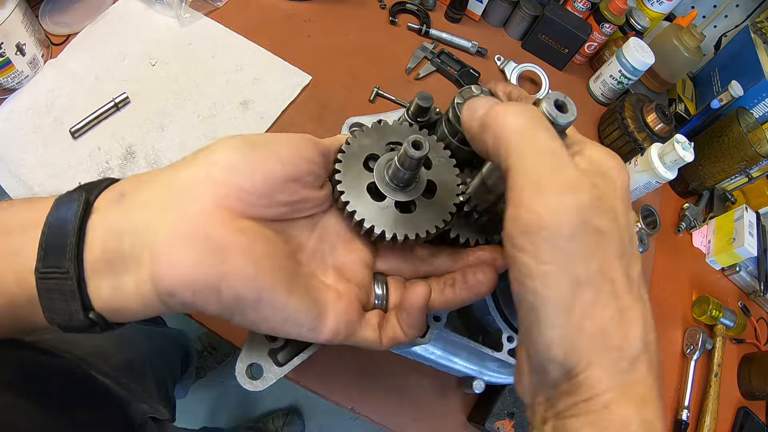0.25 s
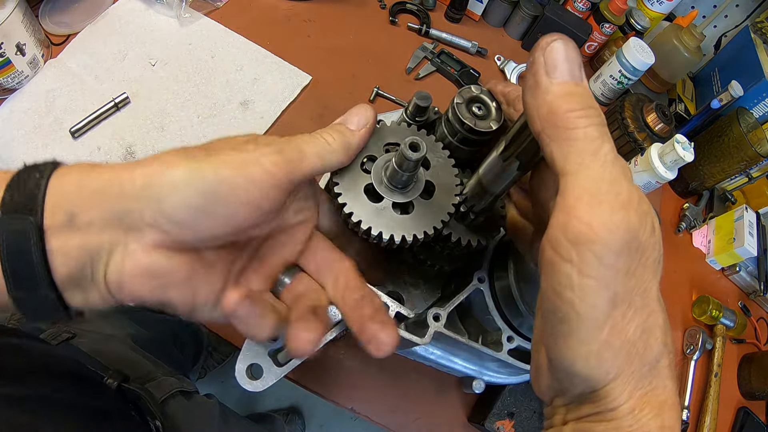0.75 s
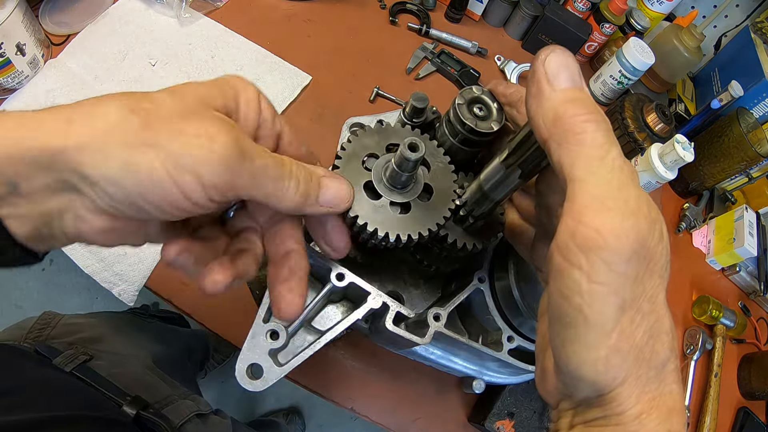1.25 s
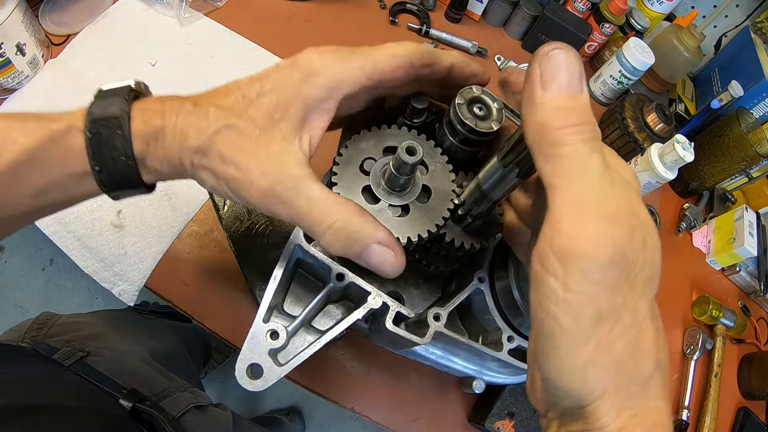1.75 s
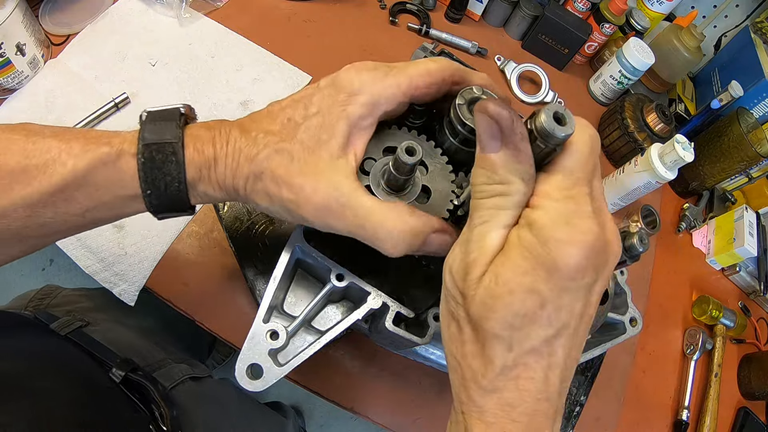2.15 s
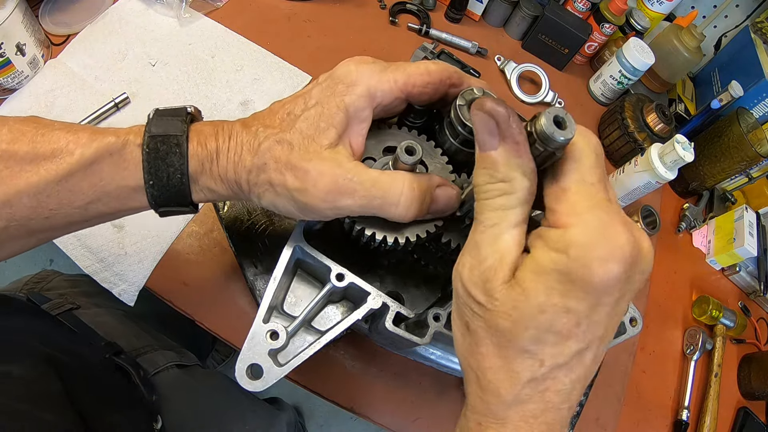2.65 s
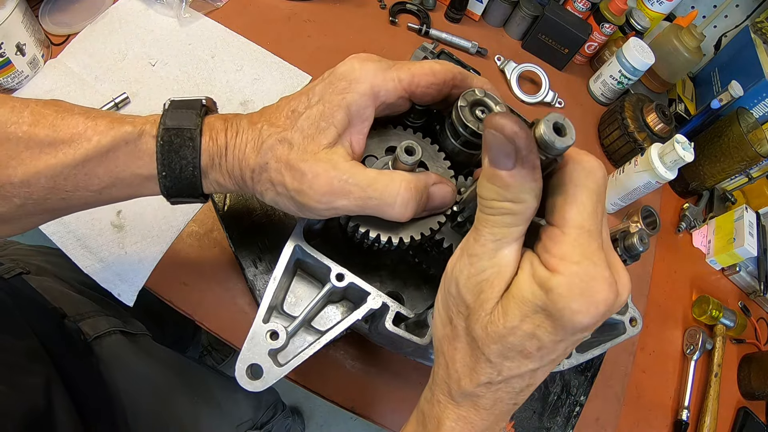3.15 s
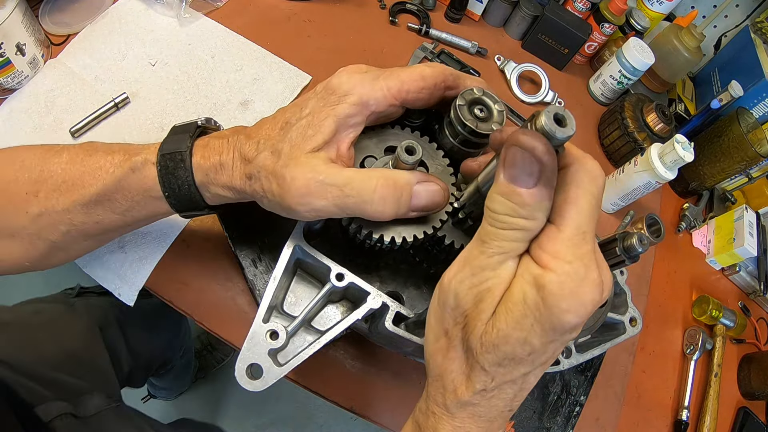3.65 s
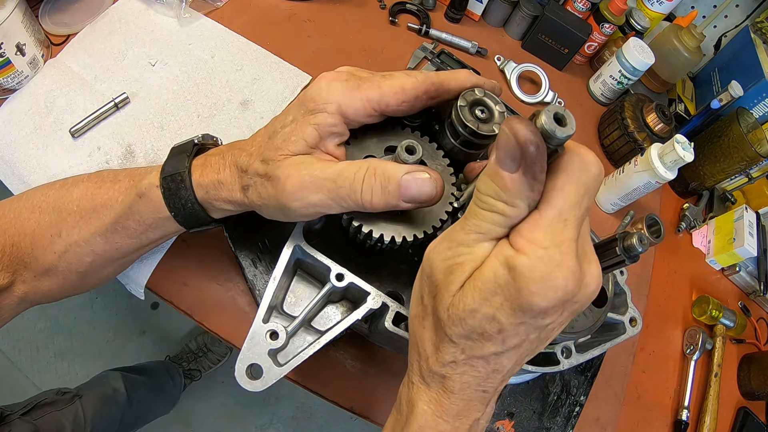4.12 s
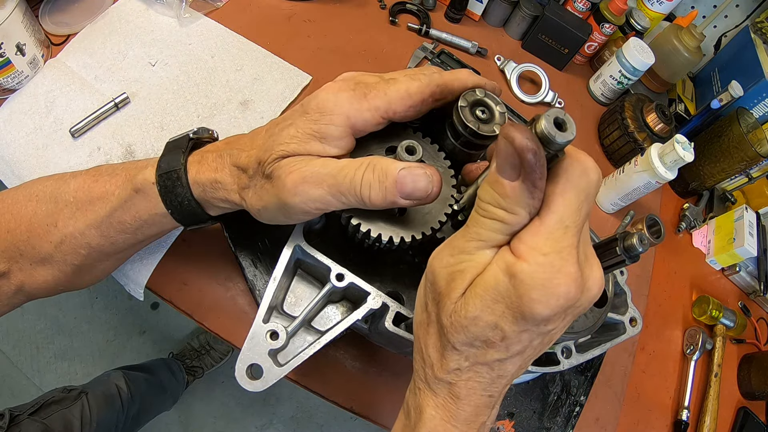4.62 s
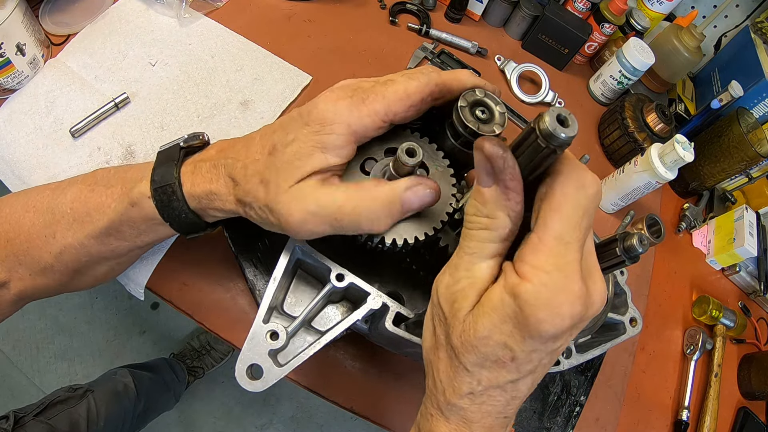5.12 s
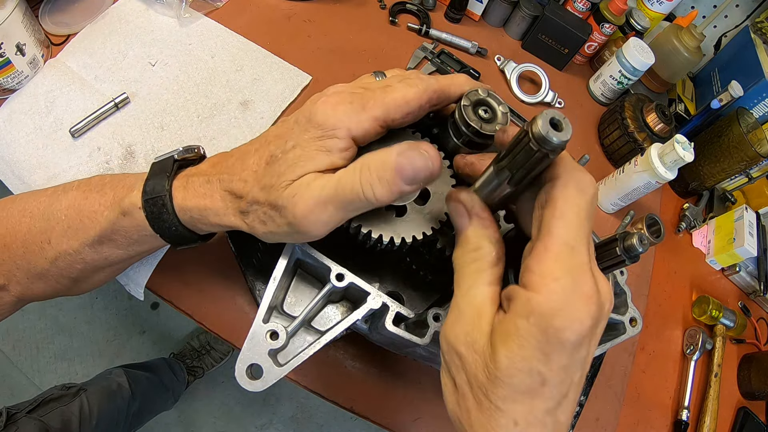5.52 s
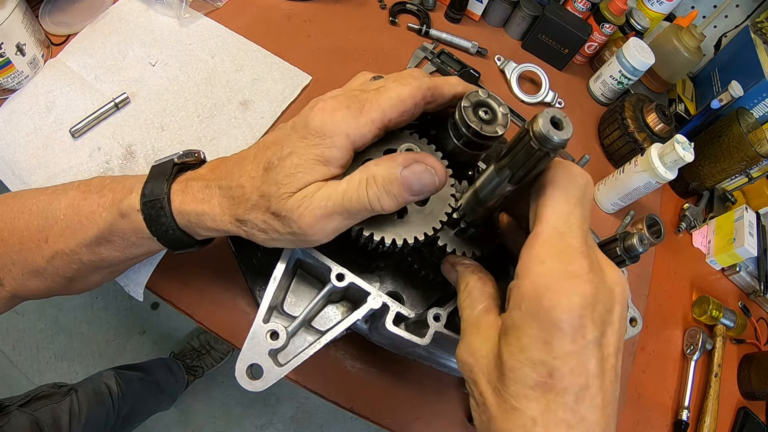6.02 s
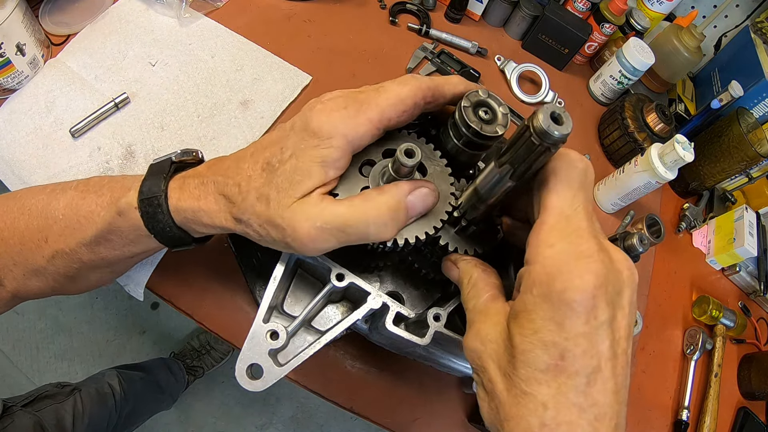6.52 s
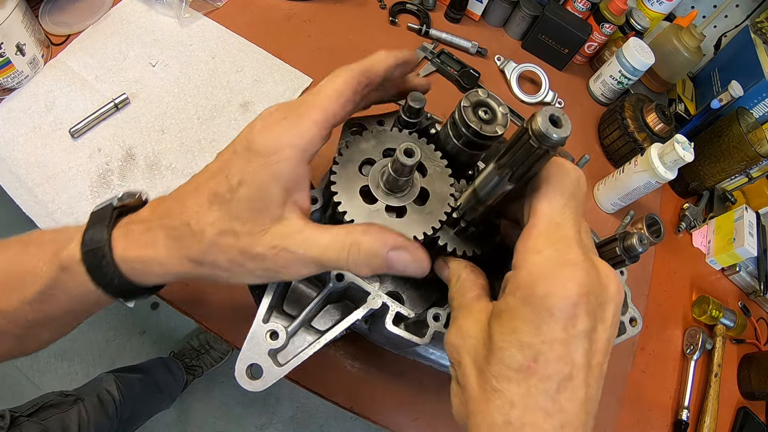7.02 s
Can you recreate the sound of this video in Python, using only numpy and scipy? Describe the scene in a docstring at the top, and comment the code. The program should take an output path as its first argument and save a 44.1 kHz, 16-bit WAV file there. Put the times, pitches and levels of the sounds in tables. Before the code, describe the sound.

Close, dry, nearly mono sound in a small workshop with faint short echoes. A low fan hum around 225 Hz wavers under a soft rush of air, the hum growing stronger after 3.5 s. At 0 s a hand rubs grainily with small ticks; at 0.25 s a shaft clacks brightly twice, and a gear tooth pings at 0.44 s. At 0.9 s a hard, bright clank rings densely; a gear wheel clacks at 1.2 s and chatters until 1.45 s. Then it is sparse: soft slides at 2.2 and 2.5 s, light clicks near 2.9 s, a small high tick at 3.1 s. A scuff at 3.5-3.9 s brings low thuds. At 4.94 s the case takes the loudest, hard double knock with a short metallic wash. Clicks follow at 5.2-5.6 s, high tinks at 5.95 and 6.03 s, then faint ticks and gentle rubbing from 6.9 s to the end.

```python
"""Gears fitted by hand into an engine case

Steel gears and shafts are worked by hand into an aluminium engine case on a workbench, close to the microphone.
A touch is a short chatter: a dry clack of band-passed noise, often with the ring of a part as decaying sines.
Hands slide over the parts as grainy noise, and low thuds sound as decaying low sines.
A fan hums in wavering tones over a noise rush in the small workshop, whose echoes are fading noise."""
import sys
import numpy as np
from scipy import signal
from scipy.fft import rfft, irfft, next_fast_len
from scipy.io import wavfile

SR = 44100
rng = np.random.default_rng(int(sys.argv[2]) if len(sys.argv) > 2 else 0)


def transcribe(signal):
    """Save signal, clipped to [-1, 1], as a 16-bit WAV file at the path in sys.argv[1]."""
    frames = np.atleast_2d(signal).T
    limited = np.clip(frames, -1, 1)
    pcm = np.round(limited * 32767).astype(np.int16)
    wavfile.write(sys.argv[1], SR, pcm)


N = 320607
TIME = np.arange(N) / SR
CUTOFF_HZ = 16000

# Blows on the engine case: (onset t/s, chatter/ms, clack level/dB, brightness/dB, ring level/dB), levels relative
CASE_HITS = [(4.938, 4.1, -16.5, 5, -8.5), (4.9443, 4.6, -18, 10, -9), (4.99, 5.1, -43, -4, -23),
             (5.047, 4.04, -47, -5, -46), (5.421, 0.99, -39.5, -9, -43), (5.655, 12, -50, -19.5, -51),
             (6.023, 5.1, -41.5, -6, -43), (6.696, 2.2, -56, -17, -47)]


def from_db(db):
    """Decibels to gain."""
    return 10 ** (np.asarray(db) / 20)


def rms_one(x):
    """Scale to rms 1."""
    return x / np.sqrt(np.mean(x ** 2) + 1e-20)


def at_time(points):
    """Read a level curve at every sample, with straight lines between its points."""
    t, level = np.transpose(points)
    return np.interp(TIME, t, level)


def at_hz(points, hz):
    """Read a spectrum on a log-frequency axis."""
    f, value = np.transpose(points)
    return np.interp(np.log(np.maximum(hz, 1)), np.log(f), value)


def band(x, low, high, order=4):
    """Causal band-pass."""
    return signal.sosfilt(signal.butter(order, [low, high], "band", fs=SR, output="sos"), x)


def noise(colour, size=N):
    """Noise of a given spectrum, rms 1."""
    padded = next_fast_len(size)
    hz = np.arange(padded // 2 + 1) * SR / padded
    spectrum = rfft(rng.standard_normal(padded)) * from_db(at_hz(colour, hz))
    return rms_one(irfft(spectrum, padded)[:size])


def drift(rate):
    """Random wander about zero: `rate` normal draws per second, joined by straight lines."""
    knots = rng.standard_normal(4000)
    return np.interp(TIME * rate, np.arange(len(knots)), knots)


def fade(t, t60):
    """Free decay, by 60 dB in t60 seconds."""
    return np.exp(-np.log(1000) * t / t60)


def add(out, s, sound):
    """Mix a sound in at time s."""
    i = max(0, round(s * SR))
    out[i:i + len(sound)] += sound[:N - i]


def radiate(x, corner_hz):
    """Small bodies push little air in the bass."""
    high_pass = signal.butter(2, corner_hz, "high", fs=SR, output="sos")
    return signal.sosfilt(high_pass, x + 1e-18)


def clack(chatter_ms, level_db, brightness_db, bounce=0.6, crack=1.0, crack_s=0.0065):
    """Micro-bounces excite the crowd of hand-damped modes of the whole assembly; hardness tilts it to the treble."""
    # Broad colour of the assembly's crowded modes: (f/Hz, relative level/dB)
    assembly_colour = [(400, -9), (750, 2), (1000, -5), (1700, 5.5), (2200, 3.5), (3200, 4.5), (4100, 0),
                       (5000, 1), (5800, -4), (6600, -7), (8200, -4.5), (9200, -9), (12000, -10.5),
                       (16000, -15)]
    # Bands of the clack: (low f/Hz, high f/Hz, t60/s, gain/dB, tilt/dB per dB of brightness)
    clack_bands = [(376, 1210, 0.102, -1.5, -0.81), (1340, 3470, 0.068, -0.5, -0.17),
                   (3984, 8000, 0.06, -5.5, 1.08), (8150, 15000, 0.0575, -25, 1.53)]
    level_window_s = 0.01  # a band's level is its rms as if all its energy fell within this time
    t = TIME[:SR // 8]

    force = np.zeros(SR // 40)
    force[0] = 1
    lags = rng.random(size=4) * chatter_ms * SR / 1000
    lags = np.clip(lags, 0, len(force) - 1).astype(int)
    force[lags] += bounce * rng.choice([-1, 1], size=4)

    crowd = noise(assembly_colour, size=len(t))
    out = 0
    for low_hz, high_hz, t60, gain_db, tilt in clack_bands:
        # the first few milliseconds are the hardest, before the energy spreads into the case
        response = crowd * (fade(t, t60) + crack * fade(t, crack_s))
        burst = band(signal.fftconvolve(response, force)[:len(t)], low_hz, high_hz)
        burst = burst / np.sqrt(np.sum(burst ** 2) / (level_window_s * SR))
        out = out + from_db(level_db + gain_db + tilt * brightness_db) * burst
    return out


def ring(modes, rise_s, scatter_db=3.5):
    """Modes build up from rest while the contact lasts; random strengths stand for the spot struck."""
    t = TIME[:SR // 2]
    out = 0
    for k, (hz, level_db, t60) in enumerate(modes):
        strength = from_db(level_db + scatter_db * rng.standard_normal())
        sign = (-1) ** k
        out = out + sign * strength * fade(t, t60) * np.sin(2 * np.pi * hz * t)
    return out * (1 - np.exp(-t / rise_s))


def part(hits, modes, ring_db, clack_db, hardness_s=0.00027, rise_share=0.14):
    """Every blow on one part: the clack and the part's own ring, whose upper modes need a hard contact."""
    ring_dulling = 0.25  # dB per octave lost for each dB that a blow is duller than the brightest one
    out = np.zeros(N)
    hardest_db = max(hit[3] for hit in hits)
    first_hz = modes[0][0]
    for s, chatter_ms, blow_db, brightness_db, level_db in hits:
        slope = ring_dulling * (brightness_db - hardest_db)
        struck = [(hz, db + slope * np.log2(hz / first_hz), t60) for hz, db, t60 in modes]
        rise_s = hardness_s + rise_share * chatter_ms / 1000
        add(out, s, clack(chatter_ms, blow_db + clack_db, brightness_db))
        add(out, s, from_db(level_db + ring_db) * ring(struck, rise_s))
    return out


def fan(hum_db=0.3, rush_db=0.0, waver_db=3.0, wander=0.33):
    """A hum, its tones wavering in level and phase, over the rush of moving air and still workshop air."""
    # Hum level, which steps up halfway: (t/s, relative level/dB)
    hum_level = [(0.0, -56), (0.12, -51.5), (3.4, -51), (3.75, -45), (7.27, -46)]
    # Tones of the hum: (f/Hz, relative level/dB)
    hum_tones = [(119.8, -16.5), (177.5, -23), (225.4, 0.5), (391, -19.5)]
    # Level of the rush of air: (t/s, relative level/dB)
    rush_level = [(0.0, -53.5), (1.2, -47), (2.0, -50), (3.7, -48), (4.55, -56), (5.25, -51.5), (6.1, -59),
                  (7.27, -60)]
    # Colour of the rush: (f/Hz, relative level/dB)
    rush_colour = [(200, -14.5), (250, 10.5), (320, -6.5), (395, 0.5), (500, -2.5), (800, -1.5), (1200, -1),
                   (2200, -11.5), (5000, -25), (12000, -41.5)]
    # Colour of the still air: (f/Hz, relative level/dB)
    air_colour = [(25, -89.5), (45, -87.5), (80, -82), (125, -80.5), (190, -75), (270, -74.5), (400, -78),
                  (700, -80), (1150, -85), (2000, -93), (4000, -99.5), (8000, -107.0), (15000, -121.0)]
    air_db = -48

    tones = 0
    for hz, db in hum_tones:
        level = from_db(db + waver_db * drift(7))
        phase = wander * drift(5.4)  # radians
        tones = tones + level * np.sin(2 * np.pi * hz * TIME + phase)
    hum = np.sqrt(2) * from_db(at_time(hum_level) + hum_db) * tones
    still_air = from_db(air_db) * noise(air_colour)
    rush = from_db(at_time(rush_level) + rush_db) * noise(rush_colour)
    return hum + still_air + rush


def stroke(s, attack_s, hold_s):
    """A slide speeds up, holds and dies away; one that starts gently ends gently."""
    release_s = 0.25 + 3.7 * attack_s  # t60
    rise = np.clip((TIME - s) / attack_s, 0, 1)
    return rise * fade(np.maximum(TIME - s - attack_s - hold_s, 0), release_s)


def rubbing(grain_db=2.5, grain_rate=250):
    """Sliding catches and lets go quickly, so its hiss is grainy."""
    # Strokes of skin, cloth or a shoe: (onset t/s, attack/s, hold/s, friction level/dB, fine hiss level/dB)
    strokes = [(0.0, 0.026, 0.15, -50, -58.5), (0.22, 0.073, 0.09, -60, -66),
               (2.234, 0.059, 0.057, -56.5, -69), (2.52, 0.034, 0.036, -57.5, -68),
               (3.522, 0.021, 0.08, -46, -64), (3.801, 0.012, .038, -41, -54),
               (6.941, 0.029, .015, -52, -63), (7.145, 0.095, 0.025, -53.5, -80)]
    # Colour of the friction: (f/Hz, relative level/dB)
    friction_colour = [(500, 6.5), (1200, 2), (2200, -6.5), (4000, -5), (7500, -9.5), (9500, -19),
                       (16000, -37)]
    # Colour of the fine hiss: (f/Hz, relative level/dB)
    hiss_colour = [(3000, -30), (7000, 2), (9000, -1), (13000, -7), (16000, -16)]
    # the light friction of hands that never quite rest
    grip_db, grip_swing_db, grip_shifts_per_s = -65.5, 3.5, 4.67

    friction = from_db(grip_db + grip_swing_db * drift(grip_shifts_per_s))
    hiss = 0
    for s, attack_s, hold_s, friction_db, hiss_db in strokes:
        speed = stroke(s, attack_s, hold_s)
        friction = np.maximum(friction, from_db(friction_db) * speed)
        hiss = hiss + from_db(hiss_db) * speed
    grain = from_db(grain_db * drift(grain_rate))
    return grain * (friction * noise(friction_colour) + hiss * noise(hiss_colour))


def fidgets(touches_per_s=3.0, chatter_ms=2.2, level_db=-54, brightness_db=0):
    """Fainter clacks while the fingers work the parts, one at a random moment in each equal slot of time."""
    out = np.zeros(N)
    slot_s = 1 / touches_per_s
    for s in np.arange(0, N / SR - slot_s, slot_s):
        add(out, s + rng.random() * slot_s, clack(chatter_ms, level_db, brightness_db))
    return out


def ticks():
    """Brief dry clacks; a separate short ping joins a few of them."""
    # (onset t/s, chatter/ms, clack level/dB, brightness/dB)
    touches = [(0.017, 1.2, -39.5, 4), (0.0888, 1.37, -40, -2), (0.109, 3.8, -42.5, 0),
               (0.457, 0.89, -48, -1), (0.476, 2.1, -47, -4), (0.857, 0.76, -40.5, 0.5),
               (0.913, 6.5, -35, 6), (0.9227, 2.4, -33, 0), (1.386, 4.3, -42, -5.5),
               (2.269, 3.8, -40.5, 0.5), (2.928, 4.9, -43, -1), (2.946, 2.2, -44, 2),
               (3.084, 5.4, -50, 3.5), (3.288, 2.8, -48.5, -7), (3.4551, 2.6, -47.5, -6),
               (3.685, 0.45, -46, -0.5), (3.721, 1.5, -48.5, 0), (3.76, 2.6, -54, 3), (3.8017, 1, -46, 1.5),
               (4.059, 3.9, -49.5, -1), (4.916, 10, -35, -4), (5.363, 3.4, -37, 0.5),
               (5.415, 0.82, -62.5, 21.5), (5.591, 0.9, -45.5, -1), (5.613, 3, -44.5, 9),
               (5.62, 2.1, -41.5, -1.5), (6.6255, 1.6, -49.5, -4), (6.882, 2.1, -48.5, -4.5),
               (7.055, 1.77, -43.5, -0.5)]
    out = np.zeros(N)
    for s, chatter_ms, level_db, brightness_db in touches:
        add(out, s, clack(chatter_ms, level_db, brightness_db))
    return out


def mating_parts(rise_s=0.0005):
    """Spline and hub give short pings from the other side of a contact."""
    # Contacts in which the spline or the hub rings: (onset t/s, relative level/dB)
    spline_hits = [(0.0177, -26), (1.4115, -29)]
    hub_hits = [(0.4405, -25.5), (0.4755, -46), (2.9345, -29)]
    # Their modes: (f/Hz, relative level/dB, t60/s)
    spline_modes = [(3430, -7, 0.041), (3920, -5, 0.028), (5690, -1, 0.034)]
    hub_modes = [(3340, -7.5, 0.022), (3480, 4.5, 0.023), (7900, -18, 0.033), (8230, -26, 0.037)]
    out = np.zeros(N)
    for hits, modes in (spline_hits, spline_modes), (hub_hits, hub_modes):
        for s, level_db in hits:
            add(out, s, from_db(level_db) * ring(modes, rise_s))
    return out


def thuds():
    """Low thuds under some blows and under the shoe scuff, as decaying low modes."""
    # Thuds: (onset t/s, relative level/dB)
    thud_times = [(0.019, -35.5), (0.255, -39), (.893, -42), (1.211, -40), (3.803, -39), (3.832, -45),
                  (3.882, -32.5), (4.058, -35), (4.941, -26), (5.421, -35.5)]
    # Low modes: (f/Hz, relative level/dB, t60/s)
    low_modes = [(107.4, -1.5, 0.12), (122.6, -1, 0.11), (170, -5, 0.088), (267, 0, 0.058),
                 (396, -4.5, 0.066), (526, -7, 0.0523)]
    out = np.zeros(N)
    for s, level_db in thud_times:
        add(out, s, from_db(level_db) * ring(low_modes, rise_s=0.0018))
    return out


def shaft():
    """Struck shaft: a clack and a ring of modes spread up through the treble."""
    # (onset t/s, chatter/ms, clack level/dB, brightness/dB, ring level/dB)
    hits = [(0.2545, 4.4, -29.5, 5, -23), (0.2635, 9.1, -31, 7, -24), (0.324, 8, -44, 1.5, -64)]
    # (f/Hz, relative level/dB, t60/s)
    modes = [(1584, -14, .05), (2582, 0, 0.056), (3920, -7, .04), (4270, -18, 0.18), (4510, -4.5, 0.052),
             (4667, -26, 0.23), (4810, 0, 0.054), (4870, 3, 0.039), (6230, -5, 0.042), (6400, -12, 0.05),
             (6729, -21, 0.2), (7040, -15, 0.072)]
    return part(hits, modes, ring_db=3.0, clack_db=-0.5)


def tooth():
    """Struck gear tooth: a clack and a high ring."""
    # (onset t/s, chatter/ms, clack level/dB, brightness/dB, ring level/dB)
    hits = [(0.4405, 1.13, -37.5, 1, -31.5), (0.599, 2.16, -45.5, -6, -36.5), (0.627, 4.6, -45, -6, -50),
            (0.664, 1.9, -55, -1, -53), (1.2135, 2, -30, 9, -30)]
    # (f/Hz, relative level/dB, t60/s)
    modes = [(4720, -1.5, 0.26), (4870, -11.5, .2), (8900, -21, 0.029), (8380, -21, 0.26),
             (11600, -26, 0.14)]
    return part(hits, modes, ring_db=-4.0, clack_db=-1.0)


def washer():
    """Struck washer: closely spaced high modes beat in a short tink."""
    # (onset t/s, chatter/ms, clack level/dB, brightness/dB, ring level/dB)
    hits = [(0.823, 3.1, -41, -4, -44.5), (2.893, 2.2, -56, -4, -56), (6.0335, 2, -32, 5.5, -24)]
    # (f/Hz, relative level/dB, t60/s)
    modes = [(8200, -3, 0.046), (8150, 1.5, 0.065), (8250, -54, 0.19)]
    return part(hits, modes, ring_db=1.0, clack_db=-4.0)


def cluster():
    """Struck gear cluster: one hard clack and a dense ring of short and long modes."""
    # (onset t/s, chatter/ms, clack level/dB, brightness/dB, ring level/dB)
    hits = [(0.8922, 0, -22, 8.7, -13)]
    # (f/Hz, relative level/dB, t60/s)
    modes = [(1134, -13.5, 0.072), (1381, -16, 0.12), (1670, -23.5, 0.203), (2720, -12, 0.046),
             (2820, -21.5, 0.235), (2900, -5.5, 0.067), (3760, -20, 0.061), (4654, 8, 0.018),
             (4630, -32, .2), (4880, -26.5, .23), (4830, -4, 0.074), (6630, -6, 0.047), (6730, -22.5, .15),
             (6760, -28, 0.195), (6830, -6, 0.048), (7180, -10.5, .05), (8300, -14, .03),
             (8680, -13.5, .03)]
    return part(hits, modes, ring_db=0.0, clack_db=-2.0)


def wheel():
    """Struck gear wheel: a clack and a short ring, strongest in its lower modes."""
    # (onset t/s, chatter/ms, clack level/dB, brightness/dB, ring level/dB)
    hits = [(1.187, 2.1, -48, -7, -42), (1.2085, 2.64, -25.5, 5, -18), (1.324, 7, -41.5, -6, -36),
            (1.3405, 0.87, -36.5, -2, -27), (1.397, 9, -34, -0.5, -34), (1.4115, 3.3, -32.5, 0, -30),
            (1.433, 1.2, -49, -1, -38), (2.84, 4.3, -50, -7, -36.5), (2.893, 3.2, -48.5, -8, -37),
            (2.9345, 0.18, -35.5, -2.5, -37)]
    # (f/Hz, relative level/dB, t60/s)
    modes = [(1170, -11, 0.056), (1324, -21, 0.046), (1610, 6.5, 0.033), (1675, 5.5, 0.039),
             (1850, -2, 0.046), (2610, 0, 0.016), (2910, -21, .09), (2930, -43, 0.029), (4760, -12, 0.035),
             (5810, -11, 0.028), (7400, -42, .05), (8150, -30, 0.038)]
    return part(hits, modes, ring_db=-2.5, clack_db=-2.0)


def collar():
    """Struck collar: a clack and a brief high ring."""
    # (onset t/s, chatter/ms, clack level/dB, brightness/dB, ring level/dB)
    hits = [(3.1375, 1, -46, 0.89, -37), (5.951, 1, -39.5, 8.1, -25.5)]
    # (f/Hz, relative level/dB, t60/s)
    modes = [(7200, 2.5, 0.038), (8100, -7, 0.025), (8600, -20, 0.026)]
    return part(hits, modes, ring_db=-2.0, clack_db=1.5)


def case():
    """Struck engine case: a clack and a ring from low knock to treble."""
    # (f/Hz, relative level/dB, t60/s)
    modes = [(560, -24, 0.029), (629, -23.5, .13), (680, 0.5, 0.039), (766, -0.5, 0.015), (2900, -5, 0.066),
             (3315, -7, 0.02), (3400, 2.5, 0.041), (4500, -2, 0.033), (5240, -13, 0.029), (5580, -10, 0.04),
             (7400, -14, .04), (7960, -15.5, .05)]
    return part(CASE_HITS, modes, ring_db=0.0, clack_db=-1.5)


def case_walls(wash_db=-27.5, t60=0.34):
    """A blow on the case spreads into countless modes of its thin walls, a dense wash of fading noise."""
    # Colour of the wash: (f/Hz, relative level/dB)
    wash_colour = [(400, 7), (700, 7), (1100, -7.5), (2200, 2), (3300, -6), (5200, -13), (8000, -17),
                   (9500, -18), (16000, -30)]
    t = TIME[:SR // 2]
    out = np.zeros(N)
    for s, *_, ring_db in CASE_HITS:
        wash = noise(wash_colour, size=len(t)) * fade(t, t60)
        add(out, s, from_db(ring_db + wash_db) * wash)
    return out


def pinion(ring_db=0.5, clack_db=0.0):
    """Light tinks; the tooth that is touched favours one or the other of two modes."""
    # (onset t/s, chatter/ms, clack level/dB, brightness/dB, ring level/dB, upper over lower mode/dB)
    hits = [(5.182, 4.5, -50, 4.5, -50, -15), (5.26, 4.5, -54, 3.5, -48.5, -3),
            (5.3065, 1.2, -49, -3, -51, 17), (6.153, 3.7, -60, 1, -52, -3)]
    # The lower and the upper mode: (f/Hz, relative level/dB, t60/s)
    modes = [(4200, 0.5, 0.078), (4880, 0.074, 0.061)]
    out = 0
    for *hit, balance_db in hits:
        struck = [(hz, db + sign * balance_db / 2, t60) for (hz, db, t60), sign in zip(modes, (-1, 1))]
        out = out + part([hit], struck, ring_db, clack_db)
    return out


def diffuse_tail(x, build_s=0.0043):
    """Smear a sound over a diffuse tail: noise bands that build up, then fade each at its own pace."""
    # Fading time in the workshop: (f/Hz, t60/s)
    workshop_t60 = [(200, 0.47), (1000, 0.4), (4000, 0.44), (8000, 0.38), (16000, 0.2)]
    t = TIME[:SR * 3 // 5]
    edges = np.geomspace(100, 18000, 9)
    tail = 0
    for low, high in zip(edges, edges[1:]):
        t60 = at_hz(workshop_t60, np.sqrt(low * high))
        tail = tail + band(rng.standard_normal(len(t)), low, high, order=3) * fade(t, t60)
    tail = tail * (1 - np.exp(-t / build_s))
    return signal.fftconvolve(x, tail / np.sqrt(np.sum(tail ** 2)))[:N]


def scene(room_db=-22.5, width_db=-49.0, treble_width_db=-24.0, treble_hz=8000):
    """Nearly mono: a very faint diffuse noise tail, stronger in the top treble, differs between the channels."""
    touches = fidgets() + ticks() + mating_parts()
    parts = shaft() + tooth() + washer() + cluster() + wheel() + collar() + case() + pinion()
    metal = radiate(touches + parts + case_walls(), corner_hz=196.4)
    near = metal + radiate(thuds(), corner_hz=77.8) + radiate(rubbing(), corner_hz=130.7)
    workshop_echoes = diffuse_tail(near)
    mid = near + from_db(room_db) * workshop_echoes + fan()
    treble = band(mid, treble_hz, CUTOFF_HZ)
    side = diffuse_tail(from_db(width_db) * mid + from_db(treble_width_db) * treble)
    return np.array([mid + side, mid - side])


def record(dry, ceiling=1.0):
    """The hardest peaks are rounded and the top is cut."""
    rounded = ceiling * np.tanh(dry / ceiling)
    low_pass = signal.ellip(10, 0.1, 80, CUTOFF_HZ, fs=SR, output="sos")
    return signal.sosfilt(low_pass, rounded)


dry = scene()
out = record(dry)
transcribe(out)
```